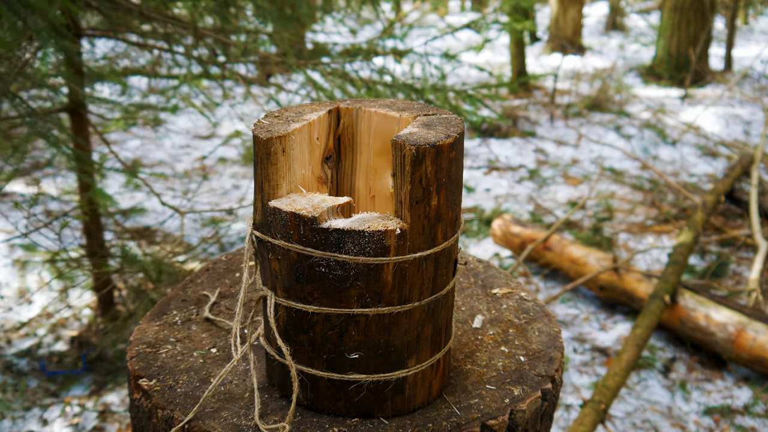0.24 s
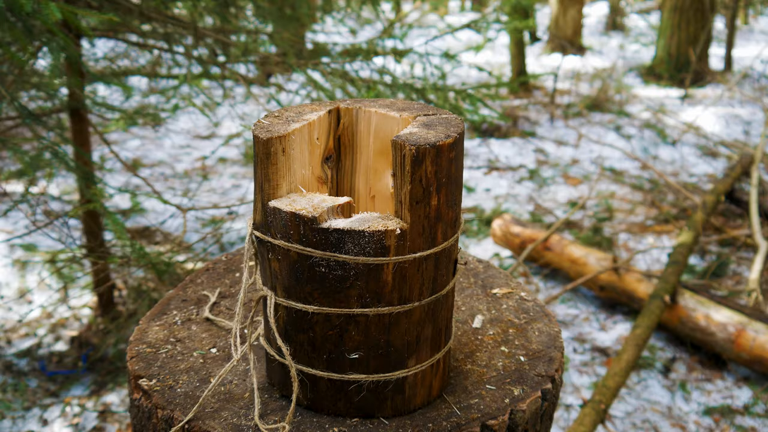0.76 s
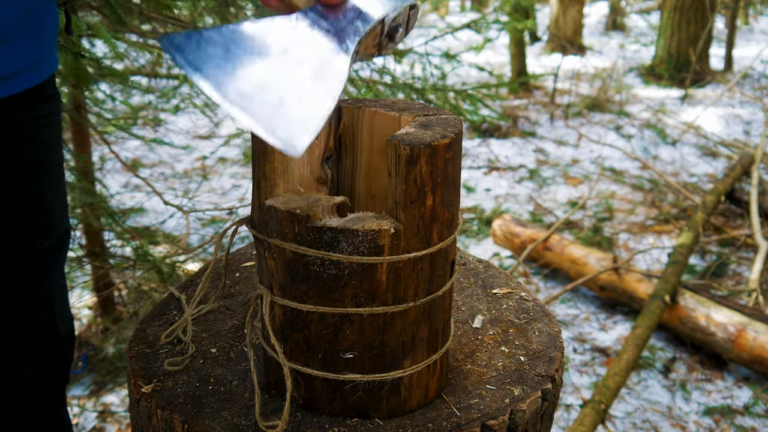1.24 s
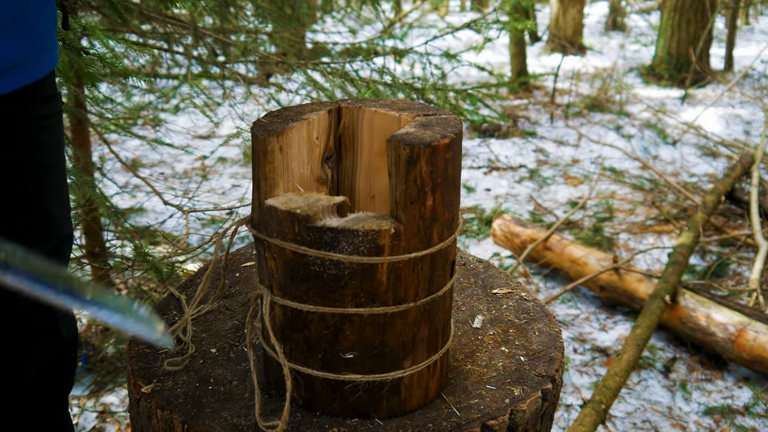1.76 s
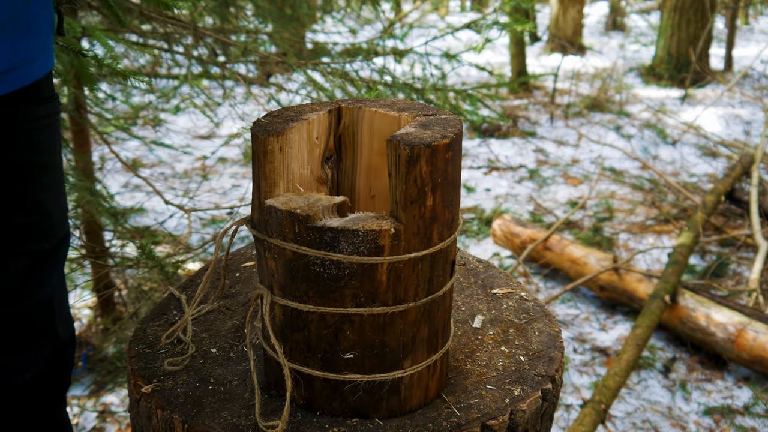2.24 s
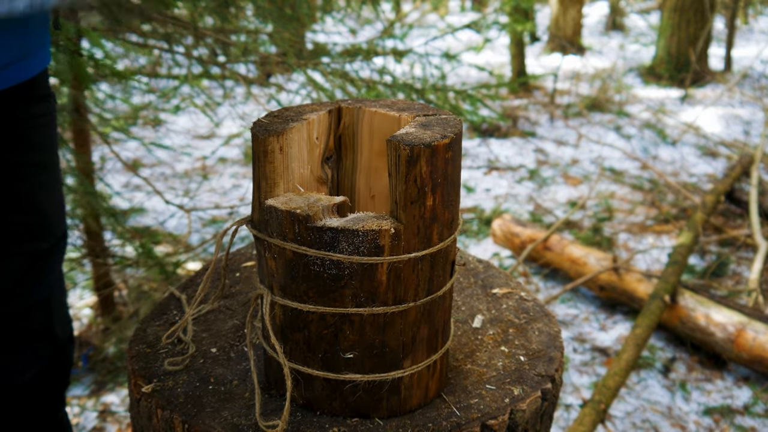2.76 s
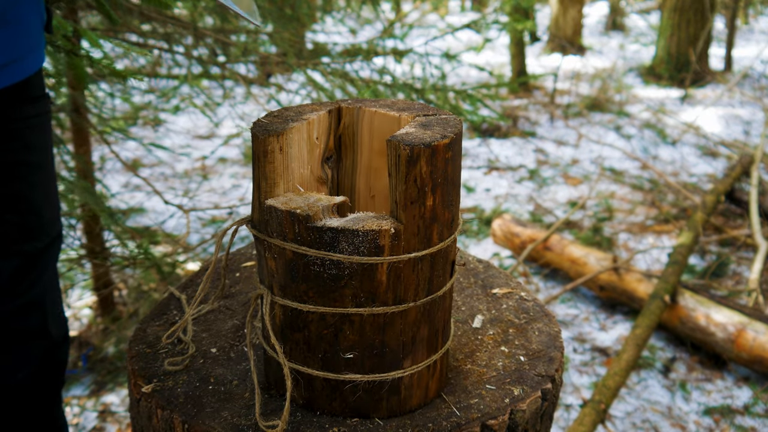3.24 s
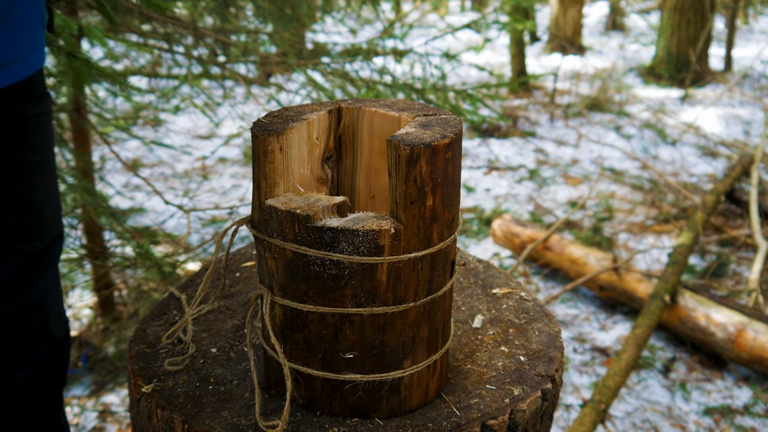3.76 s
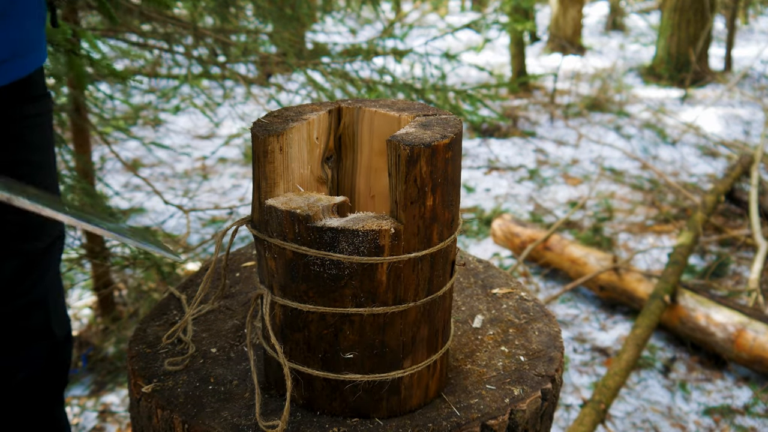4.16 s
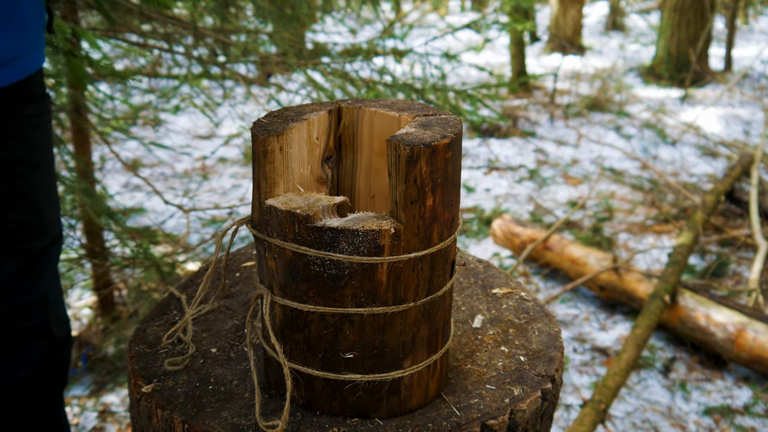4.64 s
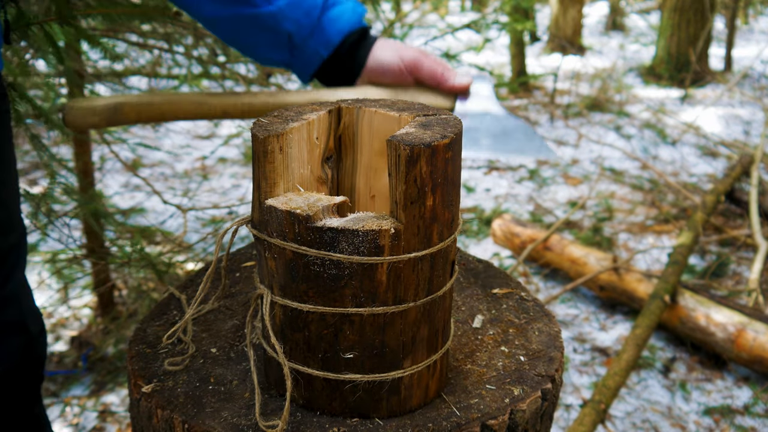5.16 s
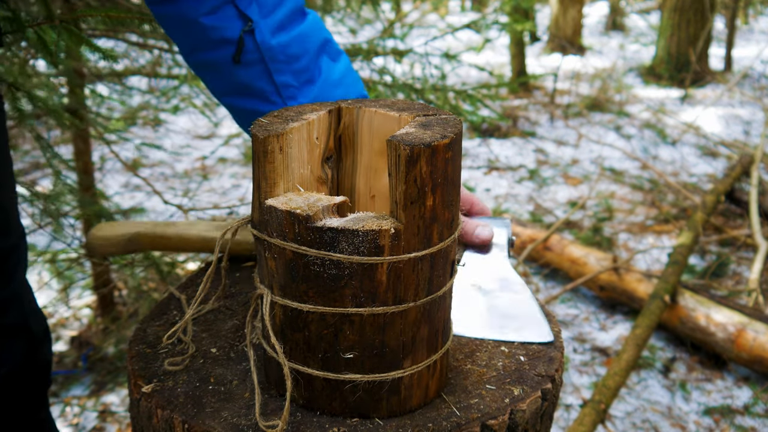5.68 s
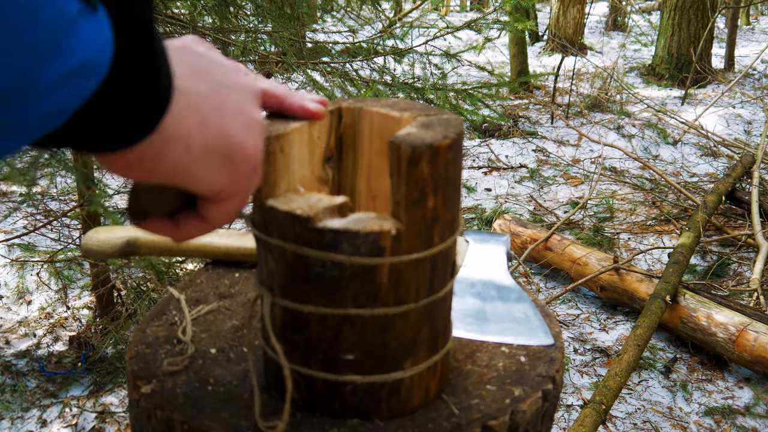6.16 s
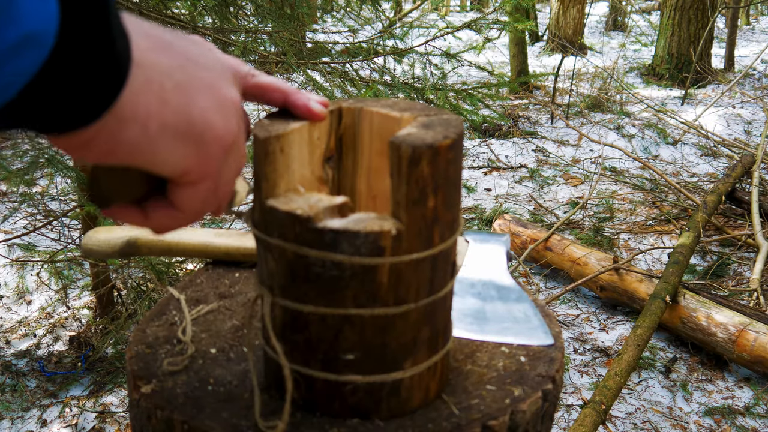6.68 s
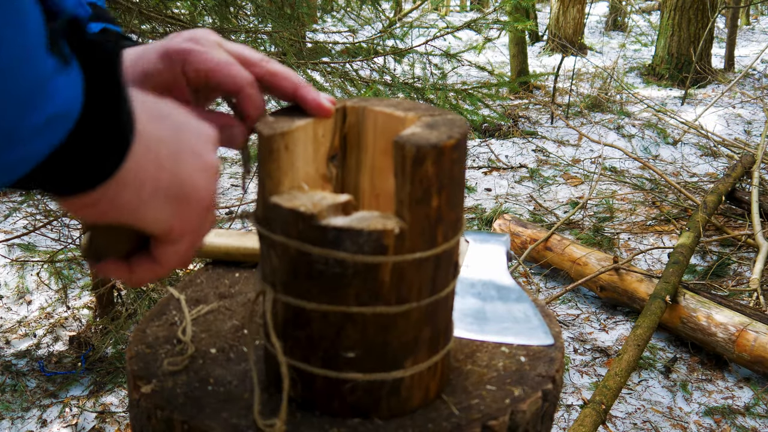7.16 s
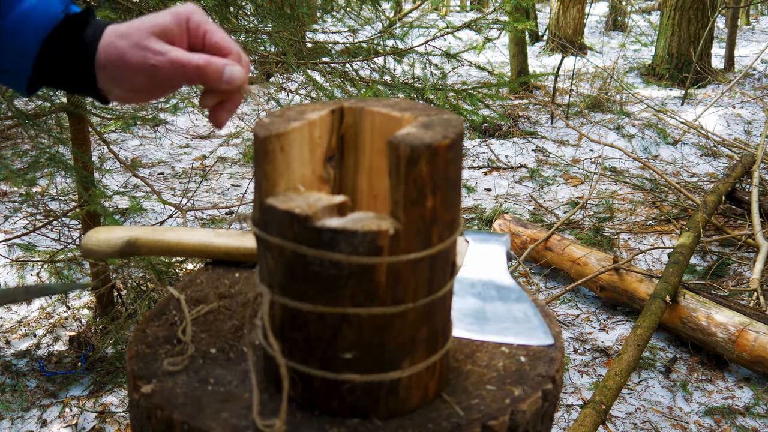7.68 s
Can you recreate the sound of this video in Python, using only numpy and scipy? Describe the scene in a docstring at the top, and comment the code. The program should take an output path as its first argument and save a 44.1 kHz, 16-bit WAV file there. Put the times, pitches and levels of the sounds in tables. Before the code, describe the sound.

A knife blade is scraped in seven quick ringing strokes along an axe head, then the axe knocks onto a wooden stump outdoors.

```python
"""In a snowy wood a sleeve of coated cloth rustles, on and off throughout, and hands and boots thump.
A knife is clapped on an axe head and drawn along its edge seven times: noisy slips drive the held blades.
The axe head rings in dying modes, and the lowest fades in and out as its lobes turn past two ports.
The axe is laid on a stump, which knocks in short wooden modes, and a hand slides off it; then the knife saws
through a cord round a hollowed log, whose resonance drums. Behind lie filtered noises of breeze and trees."""
import sys
import numpy as np
from scipy import signal
from scipy.io import wavfile
from scipy.ndimage import uniform_filter1d

SR = 44100
rng = np.random.default_rng(int(sys.argv[2]) if len(sys.argv) > 2 else 0)


def pcm_store(signal):
    """Save signal as 16-bit PCM."""
    levels = np.round(np.clip(np.atleast_2d(signal), -1, 1) * 32767)
    wavfile.write(sys.argv[1], SR, levels.astype(np.int16).T)


N = 348951

# lowest mode of the axe head: pitch, decay, sound left at a null, left over right, half angle between ports
RING_HZ, RING_DB_PER_S, LEAK_DB, RING_PAN_DB, PORTS_DEG = 3151.2, -33.5, -24.5, 5, 4.7
# spells in which the lowest mode of the axe head rings, free or under the knife: start_s, stop_s
RING_SPELLS = [(.867, 1.085), (1.105, 1.494), (1.725, 2.036), (2.263, 2.575), (2.785, 3.15), (3.478, 3.853),
               (4.1, 4.393), (4.395, 4.635), (4.648, 5.69)]
# face-on level at the start of each ringing spell: level_db
RING_LEVELS = [-31.5, -27.5, -21, -30, -13.5, -15.5, -16.5, -31.5, -21]
# turning of the axe head, 0 and 180 face-on, 90 edge-on: time_s, lobe_deg
FACING = [(0.87, 22), (1.11, 13), (1.142, 79), (1.165, 47), (1.23, 51), (1.274, 76), (1.33, 26), (1.49, 47),
          (1.73, 95), (1.785, 81.4), (1.845, 88), (1.98, 132.5), (2.03, 175), (2.27, 95), (2.338, 175),
          (2.442, 130), (2.57, 116), (2.795, 98.6), (2.828, 92), (2.887, 71), (2.943, 87.4), (3.04, 148),
          (3.148, 163), (3.48, 103), (3.558, 153), (3.692, 137), (3.85, 133), (4.11, 109), (4.168, 87),
          (4.226, 72.5), (4.27, 93.5), (4.345, 135), (4.58, 170), (4.65, 107), (4.74, 153), (4.808, 99),
          (4.838, 107), (4.881, 92), (4.925, 70.6), (4.972, 87), (5.044, 109.5), (5.074, 98), (5.114, 117),
          (5.176, 115), (5.215, 95), (5.261, 44), (5.345, 94), (5.417, 125), (5.6, 124), (5.635, 102),
          (5.658, 145), (5.69, 77)]
# upper modes of the axe head: pitch_hz, relative_db, t60_s
STEEL_MODES = [(5945, 0, .2), (9538, 0, .16), (13860, 0, .17), (4604, -20, .05), (15000, -8, .06)]

# strokes of the knife along the edge: leaves_edge_s, drag_s, flick_s, bear_down_s, bite_s,
# early_drag_db, late_drag_db, bite_db, flick_end_db, handle_db, tip_hiss_db,
# second_mode_db, third_mode_db and top_modes_db (both relative to the second mode)
STROKES = [(1.1047, 0.036, 0.069, 0.014, 0.026, -56, -49.5, -38.5, -29, -54, -23, -26, -6.5, -11),
           (1.7144, .12, 0.054, 0.015, 0.041, -49, -32.5, -32, -38, -46.5, -25.5, -21.5, -14.5, -31),
           (2.2598, 0.087, 0.1, 0.021, 0.022, -54.5, -58.5, -47, -33.5, -56.5, -26.5, -29.5, -1, -17),
           (2.7846, 0.12, 0.089, .012, 0.058, -49.5, -53.5, -33.5, -28.5, -47, -25, -22, -31, -14),
           (3.4754, .165, 0.081, .015, .025, -41.5, -51.5, -39, -30.5, -48, -24, -19, -10, -16.5),
           (4.1042, 0.18, 0.058, 0.067, 0.024, -48, -47.5, -27.5, -31.5, -43.5, -24, -17.5, -35, -34),
           (4.6427, 0.19, 0.066, 0.089, 0.01, -48, -59, -35, -35.5, -46, -23, -23.5, -34, -28)]
# both blades in contact: centre_hz, width_hz, relative_db
HELD_BLADES = [(1575, 110, -3.5), (1939, 240, 8), (2260, 820, 9), (2782, 250, 8), (3263, 260, 10),
               (3550, 123, 4.5), (4480, 550, 3.5), (5097, 150, 3), (6240, 130, -5)]
# knife handle: centre_hz, width_hz, relative_db
HANDLE = [(350, 104, -15), (688.3, 97, -6), (1004, 95, -2.5)]
# spectral shape of the hiss near the tip: frequency_hz, density_db (per Hz)
TIP_SPECTRUM = [(6000, 0.5), (7500, -11.5), (9700, -0.5), (11500, -12), (14000, -9), (16000, -25.5)]
CLEAR_S, LIFT_S = 0.036, 0.042  # the blades part; the tip has slid off
CHATTER_DB = 0.5  # rms unsteadiness of the hand's pressure
TOUCH_DB, LIFT_DB = -12.5, -48.5  # first touch re the drag; once clear re the flick
DRAG_HISS_DB, LATE_HISS_DB, LATE_HISS_S = -12.5, -11, 0.027  # re the drag; before its last swell re peak; swell
HISS_LIFT_DB, HANDLE_LIFT_DB = -39.5, -29  # ends of hiss and handle re their levels before
# catches of the edge on a burr: start_s, peak_db
CATCHES = [(1.0834, -22), (1.5338, -27.5), (2.2548, -21.5), (2.6399, -45), (2.7506, -15.5), (3.249, -42),
           (3.4291, -29), (3.9327, -30), (4.0563, -36), (4.0815, -26)]
# knife meets axe: start_s, peak_db, handle_db (re peak), brightness_db_per_octave, upper_modes_db (re peak)
CLAPS = [(0.865, -46.5, 2, 15.5, -7), (1.493, -7, -7.5, -7, -50), (1.569, -22, -11.5, -12, -44),
         (1.5924, -18.5, -19, -10.5, -46), (2.035, -3, -20.5, 5, -44), (2.5748, -10.5, -2, -5.5, -29.5),
         (3.1483, -23, -1, -4.5, -34), (3.204, -18.5, 0.5, -2.5, -27), (3.8518, -8, -4.5, -10, -45),
         (4.3917, -14, 3.5, 2.5, -27)]

# modes of the axe lying on the stump: pitch_hz, relative_db, t60_s
STUMP_MODES = [(150, 9, 0.054), (339, 8, 0.086), (518, 13.5, 0.033), (601, 3.5, 0.062), (811, -2.5, 0.145),
               (930, 6.5, 0.093), (1214, -20.5, 0.048), (1475, 8.5, 0.041), (1740, -25.5, 0.047),
               (2030, -11, 0.064), (2970, -3.5, 0.031)]
# knocks of the axe on the stump: start_s, peak_db, favoured_pitch_hz
KNOCKS = [(5.613, -19.5, 1490), (5.656, -45, 900), (5.99, -21.5, 880), (6.026, -32, 393),
          (6.105, -48.5, 330)]
# dull thumps of hand and boot: start_s, peak_db, low_edge_hz, high_edge_hz
THUMPS = [(0.115, -34.5, 159, 1100), (0.17, -24.5, 350, 1900), (0.181, -24, 298, 1600),
          (0.197, -33.5, 196.2, 1240), (0.86, -36.5, 99, 900), (1.172, -19, 287, 573),
          (4.903, -50, 450, 1400), (4.936, -47.5, 340, 1100), (5.354, -47, 380, 1200),
          (7.876, -45, 280, 600)]
# small dry ticks: start_s, peak_db, centre_hz
TICKS = [(0.2006, -25, 2840), (5.716, -43.5, 5440), (6.3526, -49.5, 4400)]
# pulls of the knife on the cord: strongest_s, rise_s, fall_s, hollow_db, fibres_db (re hollow)
PULLS = [(6.24, 0.014, 0.018, -60, 0), (6.28, 0.017, 0.019, -57.5, 3), (6.312, .017, 0.03, -54.5, -7.5),
         (6.522, 0.063, .03, -58, -5), (6.678, 0.06, 0.087, -58.5, 0), (6.826, 0.015, 0.015, -42, -12),
         (6.852, 0.04, 0.05, -51, -0.5), (6.98, .018, .03, -51.5, -5), (7.018, .028, 0.041, -47, -5.5),
         (7.137, 0.028, 0.017, -33.5, -11)]
# resonance of the hollowed log: centre_hz, width_hz, relative_db
HOLLOW = [(465, 174, 0)]
# resonances of the cord fibres: centre_hz, width_hz, relative_db
FIBRES = [(3355, 2100, 7.5), (3690, 99, 17.5), (4300, 380, -4.5), (8040, 280, -20)]
# hand sliding off the axe: strongest_s, rise_s, fall_s, level_db
SLIDES = [(6.215, 0.16, .017, -51.5)]
# resonances under the sliding palm: centre_hz, width_hz, relative_db
PALM = [(1200, 100, -1), (2190, 780, -7)]
# rubs of the sleeve: strongest_s, rise_s, fall_s, hiss_db, folds_db (re hiss), cloth_weight_db (re hiss)
RUBS = [(.06, .2, 0.22, -62.5, -21, -1), (.18, 0.05, 0.058, -57, -17, 5), (.4, 0.28, 0.11, -50.5, -24, -5),
        (.67, 0.28, 0.32, -58, -25, -2), (1.36, 0.39, 0.063, -74, 6.5, 0.5),
        (4.99, 0.16, 0.084, -64, -1.5, -1), (5.1, 0.16, 0.26, -68.5, -15, -5),
        (5.3, 0.32, 0.86, -88, 22, 14), (6.2, 0.12, 0.071, -66, -4, -2), (7.19, 0.081, 0.38, -67, -3, 1),
        (7.62, 0.17, 0.17, -74.5, -15, 2.5), (7.86, 0.13, 0.072, -67, 3.5, 2.5)]
PULL_EDGE_DB, RUB_EDGE_DB = -19, -20  # both ends of a pull and of a rub re their peak

# spread of phase between the ports for a width of 1: frequency_hz, phase_rad
PORT_SPREAD = [(200, .4), (2000, 0.62), (6000, .7), (9000, 2)]
# air on the ports, before its shares are mixed: time_s, level_db
BREEZE = [(0, -58), (1.3, -69), (2, -76.5), (5.5, -84.5), (6.3, -65.5), (7.91, -62.5)]
# spectral shape of the wood's background: frequency_hz, density_db (per Hz)
WOODS_SPECTRUM = [(15, -54), (25, -16.5), (317, -9.5), (796, -9.5), (2000, -16), (3430, -18), (4250, -17.5),
                  (16000, -32)]
# left-right likeness of the background: frequency_hz, correlation
WOODS_LIKENESS = [(60, 0.98), (600, .2), (6000, 0.065)]
WOODS_DB, EDGE_HZ = -63, 16050  # rms of the background; upper band edge of the recorder


def axe_ring():
    """Directional radiation: a dying tone whose lobes swing past the ports while its pitch bends a little."""
    level, t = np.zeros(N), np.arange(N) / SR
    for (start, stop), db in zip(RING_SPELLS, RING_LEVELS):
        elapsed = np.arange(0, stop - start, 1 / SR)
        add(level, start, gain_of(db + RING_DB_PER_S * elapsed))
    side = np.array([[1], [-1]])  # left, right
    facing = uniform_filter1d(np.interp(t, *np.transpose(FACING)), size=400) + PORTS_DEG * side
    lobes = np.cos(np.radians(facing)) + 1j * gain_of(LEAK_DB)  # the leak is a quarter turn out of phase
    lobes = lobes * gain_of(RING_PAN_DB / 2 * side)
    bend_hz = 0.98 * evened(band(rng.standard_normal(N), 2.7, 25))
    turns = np.cumsum(RING_HZ + bend_hz) / SR
    tone = (lobes * np.exp(2j * np.pi * turns)).real
    return np.sqrt(2) * uniform_filter1d(level, size=120) * tone


def releases():
    """Free vibration: the upper modes swell over the last slips of the tip, then die exponentially."""
    out, t = np.zeros(N), np.arange(round(0.4 * SR)) / SR
    swell = 1 - np.exp(-t / 0.00047)
    for s, *_, second_db, third_db, top_db in STROKES:
        for (hz, mode_db, t60), rel_db in zip(STEEL_MODES, [0, third_db, top_db, 0, top_db]):
            decay = gain_of(second_db + mode_db + rel_db - 60 * t / t60)
            add(out, s, decay * swell * np.sin(2 * np.pi * (hz * t + rng.random())))
    return out


def strokes():
    """Stick-slip: slips of edge on edge drive the held blades, the handle and, near the tip, a bright hiss."""
    blades, handle, tip = contact()
    slips = grit(180, 2.0)
    rasp = np.zeros(N)
    for hz, width, db in HELD_BLADES:  # two passes, each broadened, narrow the resonance again
        once = resonate(slips, [(hz, 1.7 * width, 0)])
        rasp += resonate(once, [(hz, 1.7 * width, db)])
    rasp += 0.023 * band(slips, 687, 9900)
    scrape = gain_of(4) * blades * patchy(rasp, 2.5)
    scrape += handle * patchy(resonate(slips, HANDLE), 5.54)
    scrape += tip * patchy(band(grit(1000, 0.62), 3700, 18000), 1.0, TIP_SPECTRUM)
    steel = [(hz, np.log(1000) / (np.pi * t60), db) for hz, db, t60 in STEEL_MODES]
    singing = gain_of(9.5) * resonate(tip * slips, steel)
    # the lowest modes keep singing under the knife, damped by the contact
    held_ring = gain_of(26.5) * resonate(blades * slips, [(RING_HZ, 14, 0), (STEEL_MODES[0][0], 25, -8)])
    return scrape + singing + held_ring


def contact():
    """Contact force: gains of blades, handle and tip through a slow drag, a quick flick and the lift."""
    out = np.zeros((3, N))
    for (off, drag_s, flick_s, touch_s, bite_s, early_db, late_db, bite_db, flick_db,
         handle_db, hiss_db, *_) in STROKES:
        flick = off - flick_s
        start = flick - drag_s
        touch, clear, end = start + touch_s, off + CLEAR_S, off + LIFT_S
        t = np.arange(start, end, 1 / SR)
        blades = np.interp(t, [start, touch, flick, flick + bite_s, off, clear],
                           [early_db + TOUCH_DB, early_db, late_db, bite_db, flick_db, flick_db + LIFT_DB])
        handle = np.interp(t, [start, touch, off, clear],
                           handle_db + np.array([TOUCH_DB, 0, 0, HANDLE_LIFT_DB]))
        tip = np.interp(t, [start, flick, off - LATE_HISS_S, off, end],
                        [early_db + DRAG_HISS_DB, late_db + DRAG_HISS_DB, hiss_db + LATE_HISS_DB,
                         hiss_db, hiss_db + HISS_LIFT_DB])
        add(out, start, gain_of([blades, handle, tip]))
    out[:2] *= gain_of(CHATTER_DB * evened(band(rng.standard_normal(N), 15, 44)))
    return uniform_filter1d(out, size=90)


def claps():
    """Impact: the held blades clank for milliseconds, the handle thuds, the upper steel modes ring on."""
    out = np.zeros(N)
    for s, db, handle_db, tilt_db, steel_db in CLAPS:
        add(out, s, gain_of(db) * rung(damped(HELD_BLADES, 0.65), tilt_db, 0.00091, 632.3))
        add(out, s, gain_of(db + handle_db) * rung(damped(HANDLE, 1.03), 0, 0.00094, 280))
        add(out, s, gain_of(db - 18.5) * thud(0.031, 870, 3200))
        add(out, s, gain_of(db + steel_db) * rung(STEEL_MODES, -26.0, 0.0053, 3000))
        add(out, s, gain_of(db - 17.0 + 1.6 * tilt_db) * thud(0.021, 4000, 14000))
        add(out, s, gain_of(db + handle_db - 26.0) * thud(0.047, 140, 420))
    return out


def edge_catches():
    """Impulsive excitation: a catch on a burr gives a small clank of the held blades and handle."""
    out = np.zeros(N)
    for s, db in CATCHES:
        add(out, s, gain_of(db) * rung(damped(HELD_BLADES + HANDLE, 0.31), 0.41, 0.00071, 500))
    return out


def wood_and_snow():
    """Modal impact: where the axe lands favours nearby stump modes; thumps and ticks are short puffs."""
    out = np.zeros(N)
    for s, db, spot_hz in KNOCKS:
        modes = [(hz, mode_db - 6.2 * abs(np.log2(hz / spot_hz)), t60) for hz, mode_db, t60 in STUMP_MODES]
        add(out, s, gain_of(db) * rung(modes, 0, 0.002, 80))
        add(out, s, gain_of(db - 13.0) * thud(0.11, 114, 404))
        add(out, s, gain_of(db - 9.5) * thud(0.046, 460, 1430))
    for s, db, lo_hz, hi_hz in THUMPS:
        add(out, s, gain_of(db) * thud(0.035, lo_hz, hi_hz))
    for s, db, hz in TICKS:
        add(out, s, gain_of(db) * thud(0.014, hz / 3.1, hz * 1.55))
    return out


def sawing():
    """Driven resonance: slips of the cord's catching, parting fibres drum in the hollow of the log."""
    hollow, fibres = swells(PULLS, PULL_EDGE_DB, 1.33)
    slips = grit(220, 2.0)
    drumming = evened(resonate(resonate(slips, HOLLOW), HOLLOW))
    tearing = patchy(band(resonate(slips, FIBRES), 1800, 9200), 2.0)
    return hollow * drumming + fibres * tearing


def slide():
    """Sliding friction: skin drags over steel that lies on wood and stops short."""
    return swells(SLIDES, -12.5, 1.8)[0] * patchy(resonate(grit(150, 1.0), PALM), 2.2)


def sleeve():
    """Friction noise: coated cloth rubs on itself as hiss, a band of folds and a low drag."""
    hiss, folds, weight = swells(RUBS, RUB_EDGE_DB, 1.83)
    rub = patchy(rng.standard_normal(N), 2.6)
    out = gain_of(4.5) * hiss * evened(band(rub, 1720, 10800))
    out += folds * evened(band(rub, 3800, 5540))
    return out + gain_of(9) * weight * evened(band(rub, 210, 2850))


def echoes(x):
    """Scattering: trunks and snow return sparse taps of either sign, dying by 60 dB in 0.12 s."""
    t = np.arange(6000) / SR
    taps = rng.choice([-1., 1.], (2, 6000)) * (rng.random((2, 6000)) < 0.05)
    taps = taps * gain_of(-60 * t / 0.12) * (t > 0.003)
    return signal.oaconvolve(x[None], taps / np.linalg.norm(taps[0]), axes=1)[:, :N]


def breeze():
    """Turbulence: lumpy low air, partly unrelated and partly shared at the two ports."""
    left, right, both = (evened(band(rng.standard_normal(N), 45, 150)) for _ in range(3))
    lumps = gain_of(2.5 * evened(band(rng.standard_normal(N), 0.96, 7.2)))
    level = gain_of(np.interp(np.arange(N) / SR, *np.transpose(BREEZE)))
    return level * lumps * (0.36 * np.array([left, right]) + 0.41 * both)


def woods():
    """Diffuse field: faint air in the trees and microphone hiss, less alike at the ports in the treble."""
    frames, hz = N // 256 + 5, np.fft.rfftfreq(1024, 1 / SR)
    a, b, c, d, patches = rng.standard_normal((frames, 513, 5)).T
    patches = uniform_filter1d(patches, size=10, axis=0)
    patches = evened(uniform_filter1d(patches, size=14, axis=1))
    same = np.clip(read(WOODS_LIKENESS, hz), -1, 1)[:, None]
    left, other = a + 1j * b, c + 1j * d
    right = same * left + np.sqrt(1 - same ** 2) * other
    z = np.array([left, right]) * gain_of(read(WOODS_SPECTRUM, hz)[:, None] + 1.3 * patches)
    return gain_of(WOODS_DB) * evened(signal.istft(z, nperseg=1024, noverlap=768)[1][:, :N])


def ports(x, pan_db, wide):
    """Diffraction: drifting phase and level gaps between the two ports; positive pan_db favours the left."""
    hz, t, z = signal.stft(x, SR, nperseg=256)
    gaps = uniform_filter1d(rng.standard_normal((len(t), len(hz), 2)), size=25, axis=0)
    phase, level = evened(uniform_filter1d(gaps, size=7, axis=1)).T
    spread = wide * read(PORT_SPREAD, hz)[:, None]
    half = np.exp(spread / 2 * (1j * phase + 0.068 * level)) * gain_of(pan_db / 2)
    return signal.istft(np.array([z * half, z / half]), SR, nperseg=256)[1][:, :N]


def grit(per_s, spread_db):
    """Random slips: noise under a train of short decaying bumps of uneven size."""
    sizes = gain_of(spread_db * np.minimum(rng.exponential(1, N), 4))
    slips = sizes * (rng.random(N) < per_s / SR)
    bumps = signal.lfilter([1], [1, -0.985], slips)
    return evened((1 + bumps) * rng.standard_normal(N))


def resonate(x, peaks):
    """Superposition: a sum of two-pole resonances of alternating sign."""
    out = np.zeros(len(x))
    for k, (hz, width, db) in enumerate(peaks):
        out += (-1) ** k * gain_of(db) * signal.lfilter(*signal.iirpeak(hz, hz / width, SR), x)
    return out


def damped(peaks, loss):
    """Bandwidth sets decay: resonances become modes with t60 = ln(1000) / (pi width loss), scattered a little."""
    modes = []
    for hz, width, db in peaks:
        t60 = np.log(1000) / (np.pi * width * loss)
        modes.append((hz * rng.uniform(0.95, 1.04), db + 4.5 * rng.standard_normal(), t60))
    return modes


def rung(modes, tilt_db, rise_s, low_hz):
    """Modal decay: modes tilted in dB per octave about 1 kHz swell during contact and die; peak 1."""
    hz, db, t60 = np.transpose(modes)[:, :, None]
    t = np.arange(SR // 3) / SR
    decay = gain_of(db + tilt_db * np.log2(hz / 1000) - 60 * t / t60)
    x = decay * np.sin(2 * np.pi * (hz * t + rng.random(hz.shape)))
    # keeps each sound's own range and removes the offset left by random starting phases
    x = band(x.sum(0) * (1 - np.exp(-t / rise_s)), low_hz, 15000)
    return x / abs(x).max()


def thud(seconds, lo_hz, hi_hz):
    """Damped impact noise: a dying filtered puff, peak 1."""
    t = np.arange(4000) / SR
    envelope = gain_of(-60 * t / seconds) * (1 - np.exp(-t / seconds / 0.065))
    x = band(rng.standard_normal(4000) * envelope, lo_hz, hi_hz)
    return x / abs(x).max()


def patchy(x, patchy_db, spectrum=((1, 0), (2, 0))):
    """Time-varying filtering: colours x and lets patches of its short-time spectrum come and go."""
    hz, t, z = signal.stft(x, SR, nperseg=512)
    patches = uniform_filter1d(rng.standard_normal((len(t), len(hz))), size=3, axis=0)
    patches = evened(uniform_filter1d(patches, size=5, axis=1)).T
    gain = gain_of(read(spectrum, hz)[:, None] + patchy_db * patches)
    return evened(signal.istft(z * gain, SR, nperseg=512)[1][:N])


def swells(rows, edge_db, pointed):
    """Envelopes: gains rise to each row's strongest moment and fall, one curve for every level column."""
    out = np.zeros((len(rows[0]) - 3, N))
    for top, rise_s, fall_s, db, *rel in rows:
        start, end = max(top - rise_s, 0), top + fall_s
        t = np.arange(start, end, 1 / SR)
        arch_db = edge_db * abs(np.interp(t, [top - rise_s, top, end], [-1, 0, 1])) ** pointed
        add(out, start, gain_of(db + arch_db + np.array([0] + rel)[:, None]))
    return uniform_filter1d(out, size=90)


def band(x, lo_hz, hi_hz):
    """Band-pass filtering."""
    edges = [lo_hz, min(hi_hz, SR / 2.1)]
    return signal.sosfilt(signal.butter(2, edges, "band", fs=SR, output="sos"), x)


def gain_of(db):
    """Logarithmic level: decibels to an amplitude factor."""
    return 10 ** (np.asarray(db) / 20)


def evened(x):
    """Normalisation to unit rms."""
    return x / np.sqrt(np.mean(x ** 2) + 1e-20)


def read(points, hz):
    """Interpolation of a spectrum table on a logarithmic frequency axis."""
    f, value = np.transpose(points)
    return np.interp(np.log(hz + 1), np.log(f + 1), value)


def add(mix, s, sound):
    """Superposition: adds a sound into the mix from second s."""
    part = mix[..., round(s * SR):][..., :sound.shape[-1]]
    part += sound[..., :part.shape[-1]]


def scene():
    """Superposition of direct sound at the ports, faint echoes and the open-air background."""
    steel = strokes() + edge_catches() + claps()
    released = releases()
    wood = wood_and_snow() + sawing() + slide()
    near = ports(steel, 1.1, 1.3) + ports(released, -2.5, 0.6)
    near += ports(wood, 0.92, 0.99) + ports(sleeve(), 5.2, 2.25)
    scattered = gain_of(-18.5) * echoes(steel + released + wood)
    return near + axe_ring() + scattered + breeze() + woods()


def record(dry):
    """Band limitation: a linear-phase low-pass stands for the recorder."""
    lowpass = signal.firwin(511, EDGE_HZ, window=("kaiser", 9), fs=SR)
    return signal.oaconvolve(dry, lowpass[None], "same", axes=1)


dry = scene()
out = record(dry)
pcm_store(out)
```